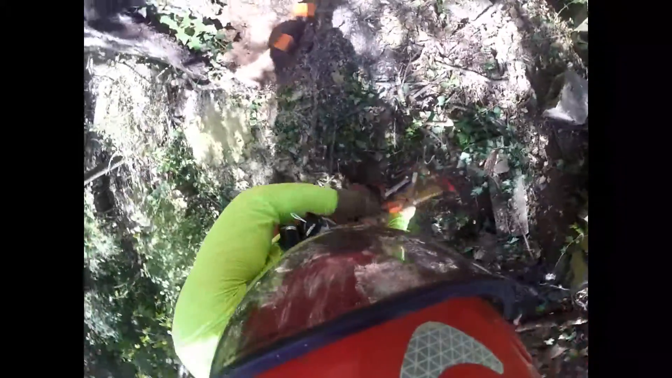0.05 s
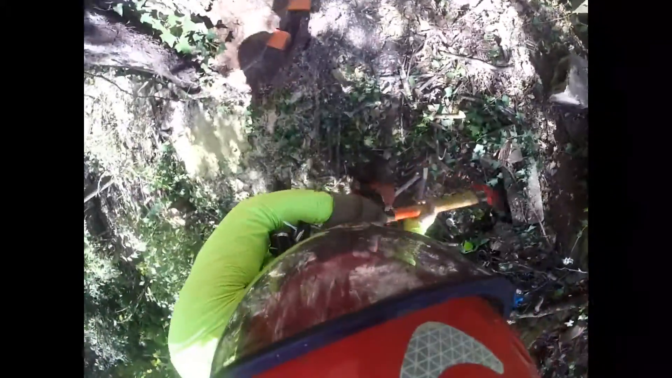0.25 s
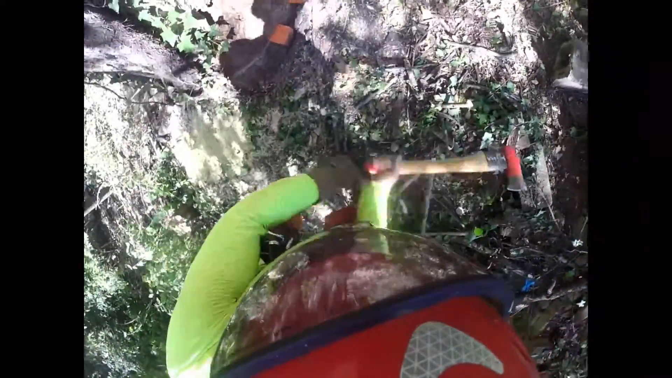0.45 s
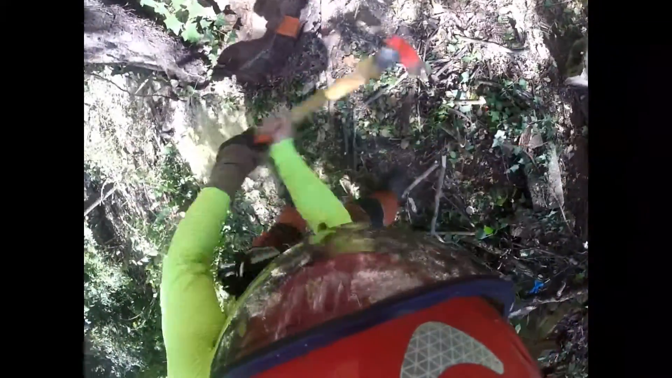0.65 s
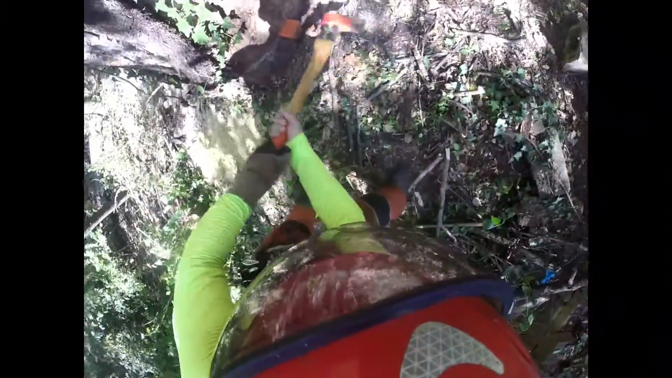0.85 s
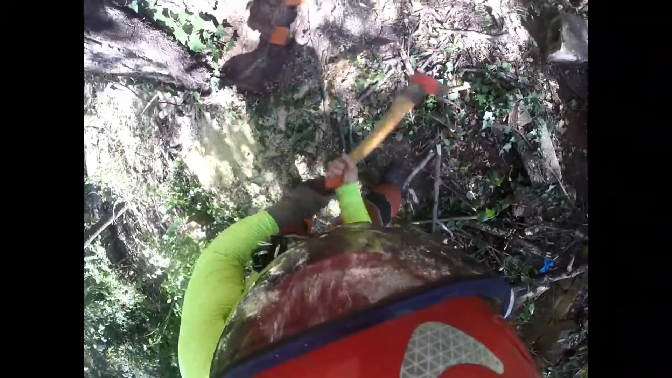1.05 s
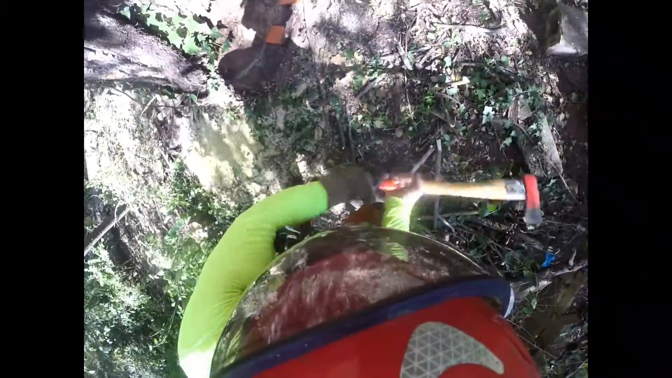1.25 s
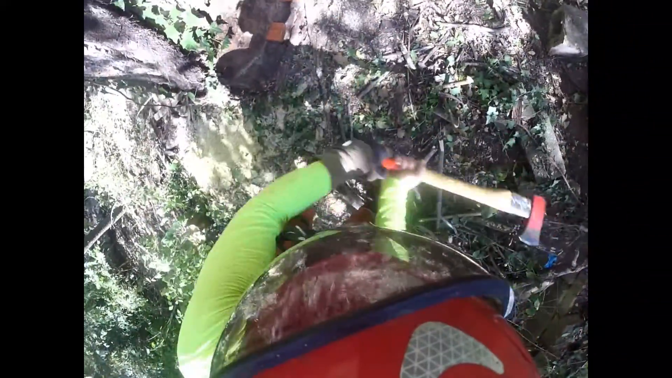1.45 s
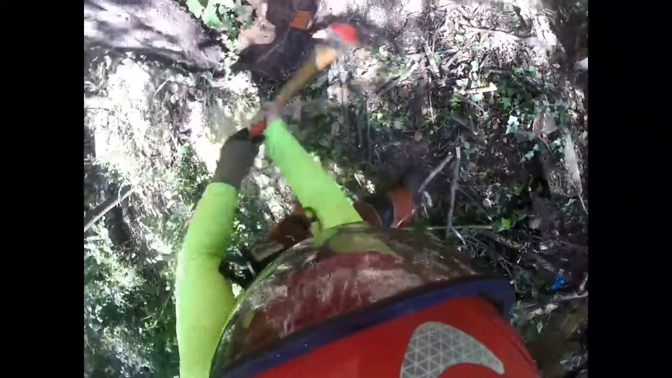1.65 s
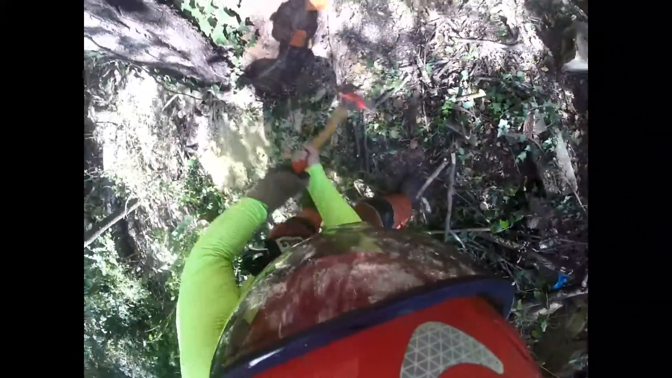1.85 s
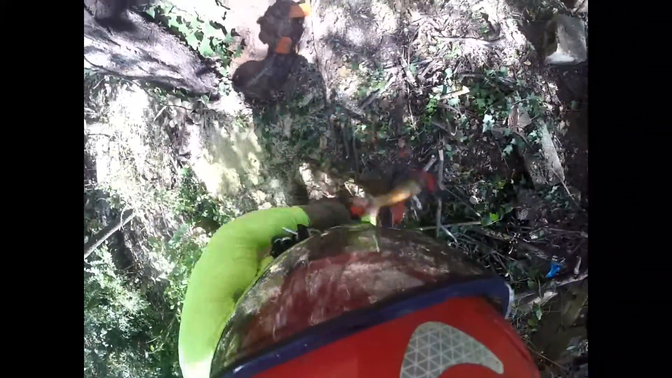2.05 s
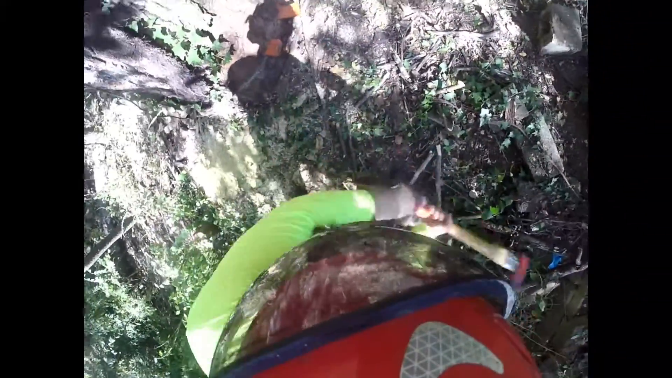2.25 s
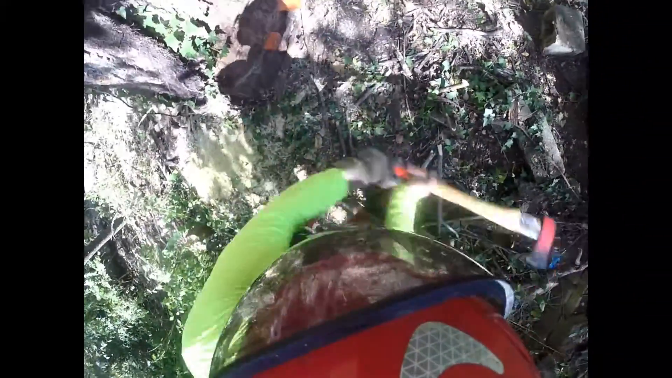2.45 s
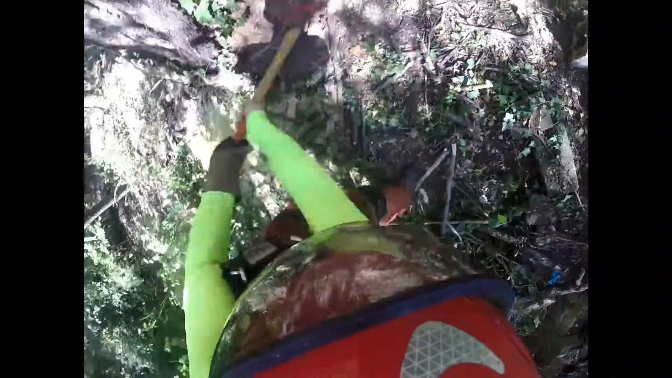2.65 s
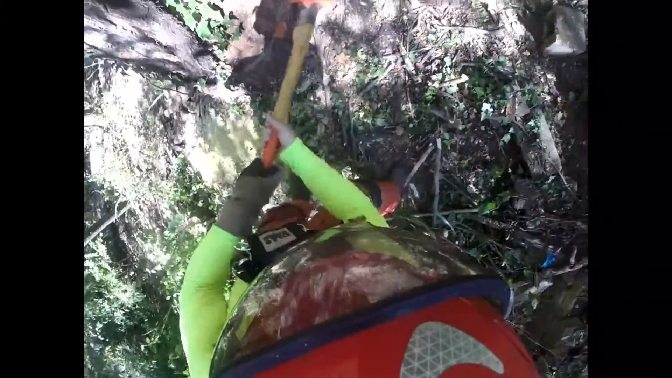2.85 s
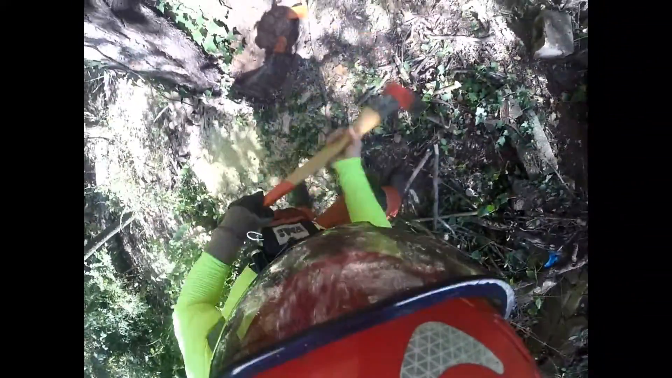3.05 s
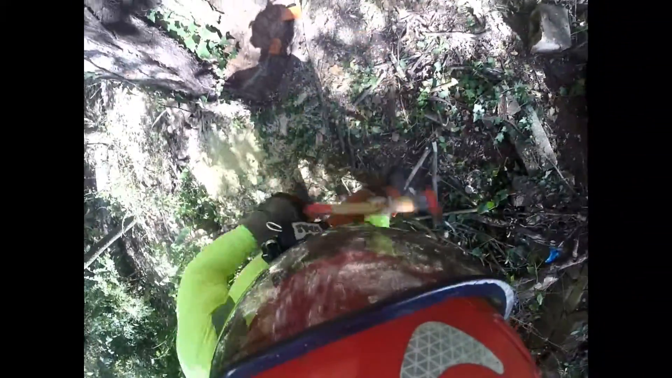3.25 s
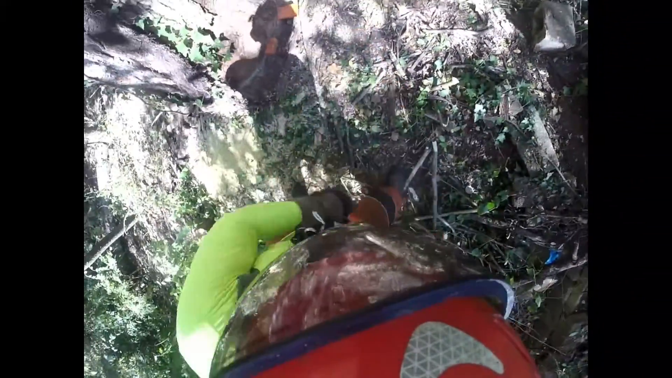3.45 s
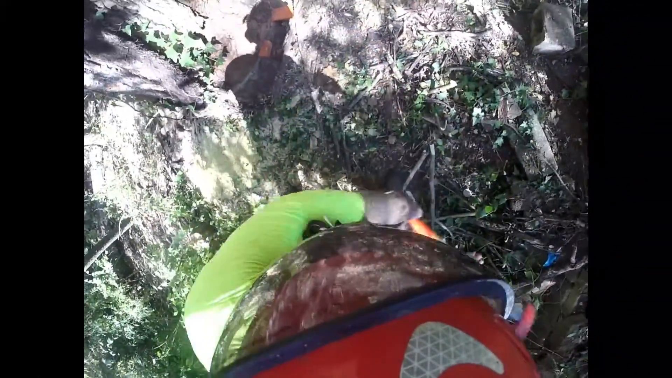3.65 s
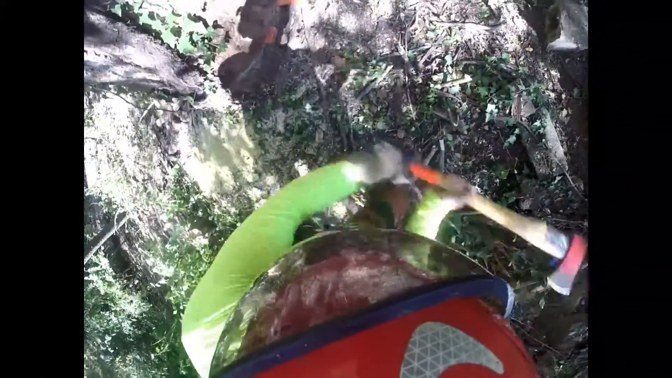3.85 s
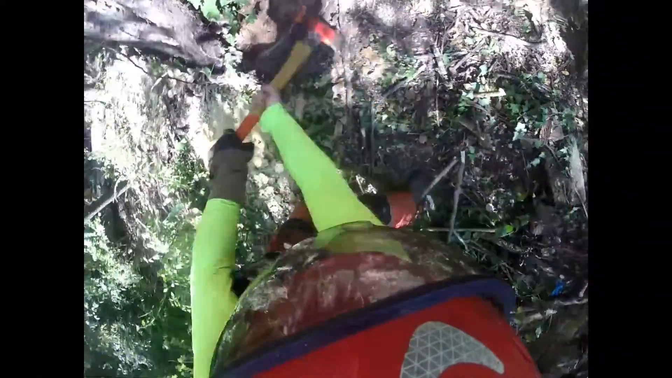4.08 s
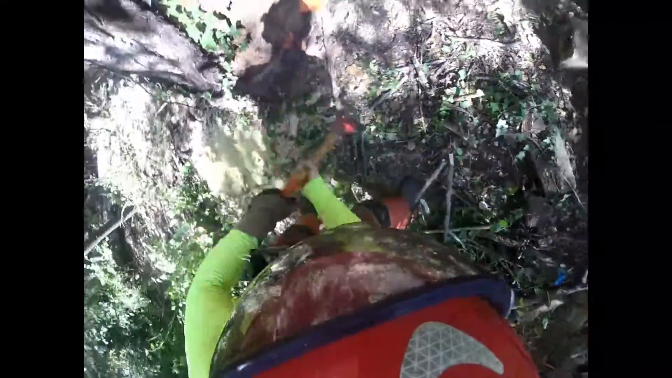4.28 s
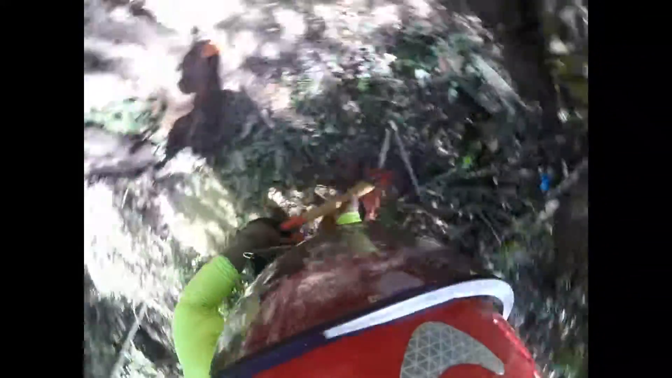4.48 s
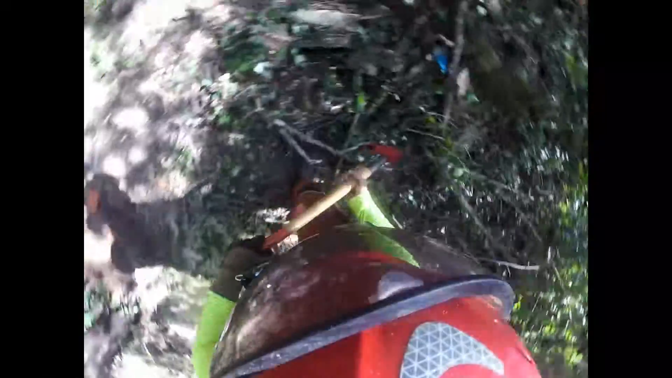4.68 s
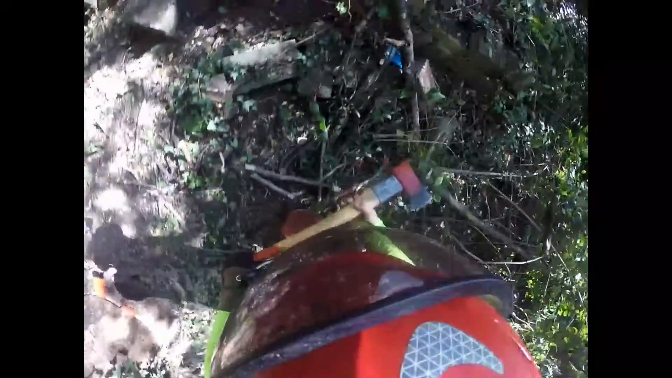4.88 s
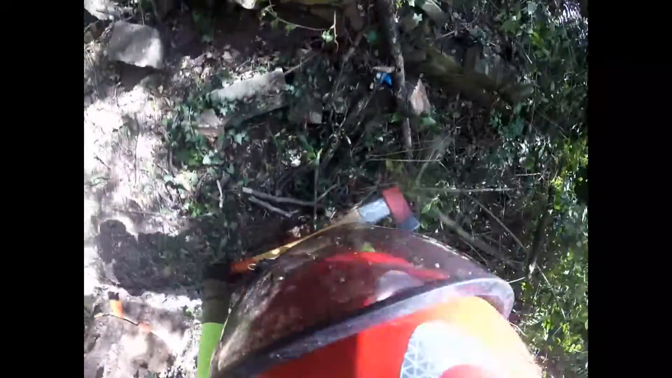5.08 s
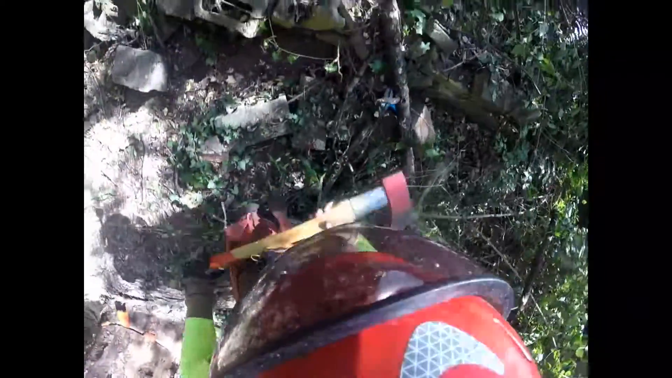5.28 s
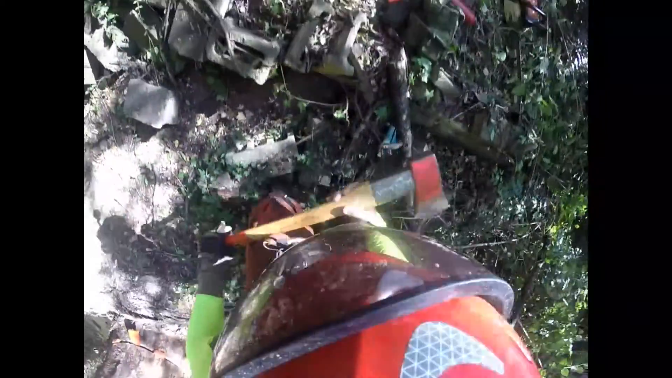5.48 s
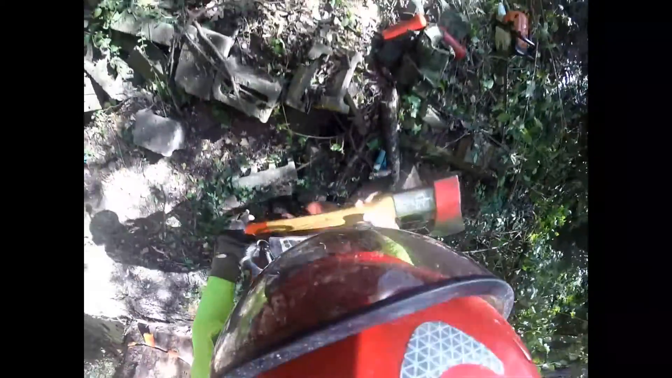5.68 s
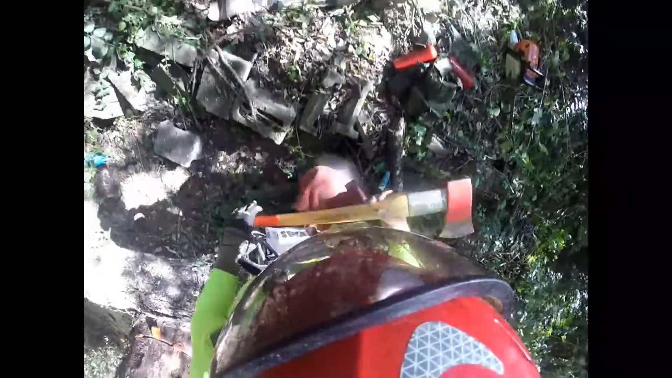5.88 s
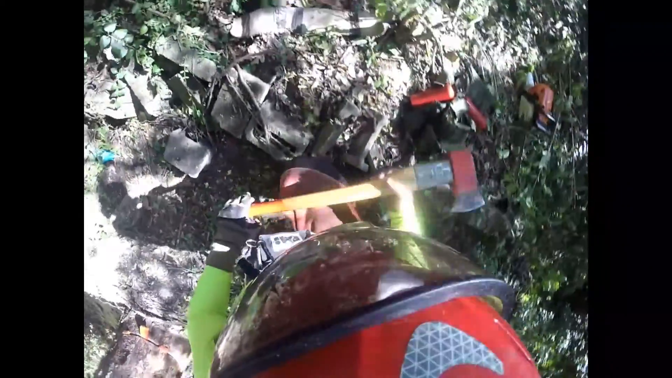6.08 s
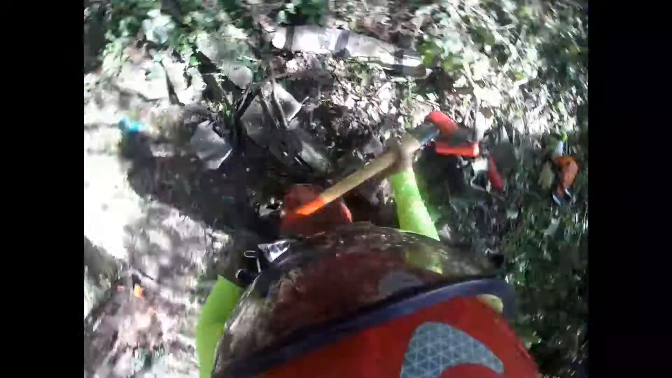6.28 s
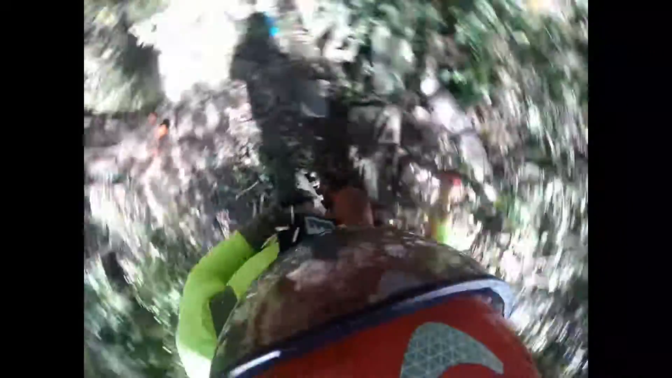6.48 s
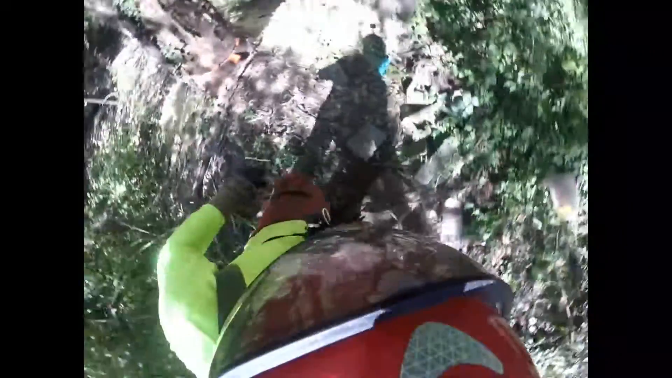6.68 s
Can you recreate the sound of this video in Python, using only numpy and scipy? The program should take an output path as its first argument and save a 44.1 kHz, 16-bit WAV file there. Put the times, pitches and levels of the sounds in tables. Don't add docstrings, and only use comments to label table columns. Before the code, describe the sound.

Outdoors in woodland, heard from a boxed camera on a helmet. Birds whistle while gear knocks and sleeves rub, then four hard hollow blows of an axe back hit a plastic wedge in a trunk, about a second apart. Each distorts, gives a quick slope echo and a rough woody tail. Twigs snap and the axe grazes a branch before the last blow; boots and harness gear thump and rustle afterwards.

```python
import sys
import numpy as np
from scipy import signal
from scipy.fft import rfft, irfft
from scipy.io import wavfile
from scipy.ndimage import uniform_filter1d

SR = 44100
rng = np.random.default_rng(int(sys.argv[2]) if len(sys.argv) > 2 else 0)


def boost(x):
    u = np.asarray(x, float) / 20
    return 10 ** u


def wrap_up_sound(samples):
    columns = np.atleast_2d(samples).T
    tamed = np.clip(columns, -1, 1)
    steps = np.round(tamed * 32767).astype(np.int16)
    wavfile.write(sys.argv[1], SR, steps)


N = 296352


def seconds(size):
    return np.arange(size) / SR


def noise(size):
    return rng.standard_normal(size)


def fade(t60_s, size):
    return boost(-60 * seconds(size) / t60_s)


def ring(hz, t60_s, size):
    return np.sin(2 * np.pi * hz * seconds(size)) * fade(t60_s, size)


def band(hz, width_hz, size):
    y = signal.lfilter(*signal.iirpeak(hz, hz / width_hz, fs=SR), noise(size))
    return y / np.std(y)


def colour(x, points):
    hz, level_db = np.transpose(points)
    bins_hz = np.maximum(np.fft.rfftfreq(len(x), 1 / SR), 1)
    gain_db = np.interp(np.log(bins_hz), np.log(hz), level_db, left=-80, right=-80)
    y = irfft(rfft(x) * boost(gain_db), len(x))
    return y / np.std(y)


def low(x, hz):
    return signal.sosfilt(signal.butter(2, hz, fs=SR, output="sos"), x)


def walk(rate_hz):
    k = int(SR / rate_hz)
    steps = np.repeat(noise(N // k + 1), k)
    y = uniform_filter1d(uniform_filter1d(steps, k), k)[:N]
    return y / np.std(y)


def add(out, start_s, x):
    i = int(start_s * SR)
    out[i:i + len(x)] += x[:len(out) - i]


# hz, level_db (density)
SNAP = [(1200, -5), (2600, 0), (4000, -2), (5600, -3), (8000, -16), (11000, -25), (15000, -36)]


def snap(size):
    return colour(noise(size), SNAP)


# start_s, drive_db, wedge_hz, wedge_t60_s, crack_db
BLOWS = [
    (0.789, 3, 744, 0.023, -17),
    (1.742, 8.5, 780, 0.021, -19),
    (2.7103, 1, 796, 0.032, -11),
    (4.1203, 8, 706, 0.015, -17.5),
]
# limiter_cut_db, echo_db, scatter_db, gain_duck_db
AFTER = [
    (0, -29, -39, -8.5),
    (-31.5, -25.5, -34.5, -8.5),
    (-10, -25.5, -35.5, -9.5),
    (-21.5, -24, -36.5, -10),
]
# handle_db, trunk_db, hollow_db, overtone_hz, overtone_db
LANDING = [
    (-13, -13, -5, 620, -3.5),
    (-17.5, -9.5, -12.5, 1480, -8.5),
    (-0.5, -3.5, -12.5, 566, 0),
    (-16, -9.5, -3.5, 870, -17),
]
# hz, t60_s
WOOD = [
    (131, 0.021),
    (427, 0.096),
    (530, 0.047),
]
# hz, level_db, t60_s
BODY = [(199, -10.5, .035), (305, -12, 0.032), (906, -23, 0.018), (1530, -22.5, 0.015), (2440, -20, 0.018),
        (3400, -30, 0.045), (3880, -19.5, 0.02)]


def strike(blow, after, landing, size):
    _, drive_db, wedge_hz, wedge_t60_s, crack_db = blow
    *wood_db, overtone_hz, overtone_db = landing
    t = seconds(size)
    lift_s = 0.156 * max(drive_db, 0) * 0.0011
    cycles = wedge_hz * (t + lift_s * (1 - np.exp(-t / 0.0016)))
    sound = 1.21 * np.sin(2 * np.pi * cycles) * fade(wedge_t60_s, size)
    sound += boost(overtone_db) * ring(overtone_hz, 1.3 * wedge_t60_s, size)
    for (hz, t60_s), level_db in zip(WOOD, wood_db):
        sound += boost(level_db) * ring(hz, t60_s, size)
    for hz, level_db, t60_s in BODY:
        level_chance, pitch_chance = noise(2)
        sound += boost(level_db + 2 * level_chance) * ring(hz * (1 + 0.015 * pitch_chance), t60_s, size)
    contact_s, push_s = 0.0026, 0.0013
    sound += boost(crack_db) * snap(size) * np.exp(-(t / contact_s) ** 2)
    push = np.sin(np.pi / 2 * np.minimum(t / push_s, 1)) ** 2
    no_bass = signal.butter(4, 105, "high", fs=SR, output="sos")
    sound = signal.sosfilt(no_bass, boost(drive_db) * push * sound)
    limiter_lag_s, limiter_bite_s = 0.004, 0.0012
    limiter_db = after[0] * np.clip((t - limiter_lag_s) / limiter_bite_s + 0.5, 0, 1)
    return signal.lfilter(*signal.butter(2, 70, "high", fs=SR), boost(limiter_db) * sound)


def slope_echo(size):
    echo = ring(806, 0.036, size) + 0.07 * snap(size) * np.exp(-(seconds(size) / 0.0026) ** 2)
    return echo + 0.5 * np.roll(echo, int(0.007 * SR))


# hz, level_db (density)
SCATTER = [(88, -21), (150, 5), (203, -13), (359, -5), (460, -16.5), (525, -3.5), (647, -4), (860, -3),
           (1140, -33), (3070, -17.5), (3640, -18), (5740, -19.5), (14000, -49.5)]
# hz, width_hz, level_db (re scatter), t60_s
BOX = [
    (2440, 600, -17.5, .8),
    (800, 120, -12.5, 1),
]
# hz, level_db (re scatter)
TAIL = [
    [(2040, -13), (3020, -9)],
    [(2440, -7), (1750, -14.5)],
    [(2516, -19), (3100, -12.5)],
    [(2000, -21), (2660, -14.5)],
]


def wood_scatter(tones, size):
    scatter = colour(noise(size), SCATTER)
    dull = low(scatter, 7000)
    t60_s = 0.41
    tail = dull * fade(1.28 * t60_s, size) + (scatter - dull) * fade(0.76 * t60_s, size)
    for hz, width_hz, level_db, box_t60_s in BOX:
        tail += boost(level_db) * band(hz, width_hz, size) * fade(box_t60_s, size)
    for hz, level_db in tones:
        tail += boost(level_db) * band(hz, 170, size) * fade(0.6, size)
    return tail * np.minimum(seconds(size) / 0.0028, 1)


def blows():
    out, size, echo_s = np.zeros(N), SR * 3 // 4, 0.0785
    for blow, after, landing, tones in zip(BLOWS, AFTER, LANDING, TAIL):
        start_s = blow[0]
        _, echo_db, scatter_db, _ = after
        add(out, start_s, strike(blow, after, landing, size))
        add(out, start_s + echo_s, boost(echo_db) * slope_echo(size))
        add(out, start_s, boost(scatter_db) * wood_scatter(tones, size))
    return out


# start_s, peak_db, hollow_hz, snap_db
KNOCKS = [(0.091, -31, 770, -33.5), (0.116, -42, 608, -36), (0.167, -39, 1490, -35.5),
          (0.469, -23, 680, -38), (0.546, -18, 597, -42), (1.482, -26.5, 670, -37), (2.248, -44, 466, -48),
          (2.65, -38, 654, -39.5), (3.784, -34, 393, -39.5), (4.178, -21.5, 457, -32),
          (5.273, -43, 670, -38), (5.351, -50, 781, -46), (5.814, -16, 570, -33.5), (6.05, -27, 785, -50),
          (6.068, -26, 1005, -42), (6.264, -28, 740, -41), (6.4955, -25, 690, -34), (6.52, -19.5, 710, -22)]
# start_s, peak_db, hollow_hz, snap_db, snap_hz
TWIGS = [(0.191, -42, 715, -35, 4190), (0.451, -25, 550, -40, 4770), (1.694, -39, 842, -34, 5300),
         (3.972, -14, 800, -20, 5200), (3.98, -18.5, 523, -26, 3880), (4.06, -28, 784, -24.5, 5860),
         (5.274, -43, 670, -37.5, 5540), (5.394, -53, 407, -41, 3800), (5.456, -22.5, 415, -37, 5210),
         (5.504, -34, 690, -31, 5570)]


def knocks():
    out, size = np.zeros(N), SR // 5
    gear = [(*row, 2595, 0.042) for row in KNOCKS]  # snap_hz, snap_t60_s
    twigs = [(*row, 0.028) for row in TWIGS]
    for start_s, peak_db, hollow_hz, snap_db, snap_hz, snap_t60_s in gear + twigs:
        hollow = ring(hollow_hz, 9 / hollow_hz + 0.025, size)
        hollow += 0.5 * ring(0.97 * hollow_hz, 9 / hollow_hz + 0.01, size)
        dry_snap = 0.54 * snap(size) + 0.55 * band(snap_hz, 0.033 * snap_hz, size)
        dry_snap *= fade(snap_t60_s, size)
        add(out, start_s, 0.52 * boost(peak_db) * hollow + 0.5 * boost(snap_db) * dry_snap)
    return out


# start_s, level_db
GRAZE = [
    (3.973, -20.5),
    (3.981, -34),
]
# hz, level_db, t60_s
HEAD = [(3780, -1, 0.014), (6050, -2, 0.013), (2740, -7, .02)]


def graze():
    out, size = np.zeros(N), SR // 5
    for start_s, level_db in GRAZE:
        for hz, mode_db, t60_s in HEAD:
            add(out, start_s, boost(level_db + mode_db) * ring(hz, t60_s, size))
    return out


# start_s, peak_db, hz, cycles
THUDS = [(0.093, -32, 99, 2.5), (0.209, -34, 59.3, 2.4), (.466, -21.5, 132, 3), (0.548, -19.5, 175, 1.7),
         (5.45, -32, 35.2, 3.1), (5.457, -21.5, 252, 2.7), (5.57, -13.5, 180, 0.79), (6.044, -25, 124, 1.3)]


def thuds():
    out, size = np.zeros(N), SR // 5
    nods = [(blow[0] + 0.081, -36, 60, 2.6) for blow in BLOWS]
    for start_s, peak_db, hz, cycles in THUDS + nods:
        onset = np.minimum(seconds(size) * hz * 2, 1)
        add(out, start_s, boost(peak_db) * ring(hz, 3.3 * cycles / hz, size) * onset)
    return out


# start_s, peak_db, hz, t60_s
CLINKS = [(0.966, -62, 13400, 0.05), (1.696, -41, 5400, 0.061), (2.148, -50, 13510, .14),
          (2.651, -54, 10350, 0.068), (2.829, -55, 13300, 0.075), (3.101, -73, 13500, 0.091),
          (4.061, -48, 10450, 0.048), (4.23, -77, 13400, .1), (2.421, -71, 13300, .08),
          (5.395, -54, 10800, 0.023), (4.6, -56.5, 13500, 0.081), (4.789, -60, 14000, 0.026)]


def buckle():
    out, size = np.zeros(N), SR // 4
    for start_s, peak_db, hz, t60_s in CLINKS:
        tick = np.diff(noise(size + 1)) * fade(0.0097, size)
        pair = ring(hz, t60_s, size) + 0.23 * ring(0.978 * hz, 0.8 * t60_s, size)
        add(out, start_s, boost(peak_db) * (pair + 0.39 * tick))
    return out


def grains(rate_hz, scatter_db):
    hits = noise(N) * (rng.random(N) < rate_hz / SR)
    return hits * boost(scatter_db * np.minimum(rng.exponential(size=N), 4))


EARLY_S = [.014, .007, .016, .017]
# time_s, level_db
MOTION = [(0, -59), (.146, -50.5), (.334, -51.5), (.69, -62.5), (1.55, -51.5), (2.6, -57.5), (3.4, -62),
          (3.7, -51), (4.05, -55), (4.84, -51), (5.09, -51), (5.44, -48.5), (5.67, -45.5), (5.83, -55.5),
          (6.19, -60), (6.72, -53)]


def motion_levels():
    t = seconds(N)
    bed_db, rush = np.interp(t, *np.transpose(MOTION)), np.zeros(N)
    starts_s = [blow[0] for blow in BLOWS]
    still_s, resume_db, resume_db_s = 0.58, -15, 79
    swing_s, swing_db = 0.06, -50
    for start_s, until_s in zip(starts_s, starts_s[1:] + [N / SR]):
        rested_s = t - start_s - still_s
        back_db = np.where(rested_s > 0, np.minimum(resume_db + resume_db_s * rested_s, 0), -80)
        bed_db += back_db * (t > start_s) * (t <= until_s)
        rush += boost(swing_db) * np.exp(np.minimum(t - start_s, 0) / swing_s) * (t < start_s)
    return np.array([boost(bed_db) + rush, boost(bed_db - 12.5)])


# hz, level_db (density)
RUB = [(60, 1.5), (150, 3.5), (300, 0.5), (600, 3), (900, -0.5), (1200, -17.5), (2000, -50)]
# hz, level_db (density)
LEAVES = [(650, -35.5), (1100, -3), (1400, -7), (2410, 1.5), (3220, -11), (3560, -5), (6250, -4.5),
          (6990, -9), (9630, -19), (15500, -31)]
# peak_s, fall_s, dull_db, crisp_db, rasp_hz
SCRAPES = [(0.099, 0.02, -42, -53, 2700), (.462, 0.079, -37.5, -57, 2190), (0.511, 0.092, -45, -51.5, 4800),
           (1.65, 0.022, -53.5, -61.5, 3070), (3.103, 0.031, -70, -67, 2500), (3.78, 0.011, -47, -58, 5505),
           (3.991, 0.039, -52.5, -53, 5535), (4.86, 0.015, -47.5, -66, 2800),
           (5.059, 0.027, -72, -59, 2850), (5.296, 0.009, -40, -59, 5500),
           (5.458, 0.017, -32.5, -51.5, 5300), (5.823, 0.039, -36, -53.5, 5730),
           (6.0, 0.025, -45, -57, 4480), (6.065, 0.16, -50.5, -55.5, 2620), (6.29, 0.21, -51, -61.5, 5460),
           (6.512, 0.067, -38, -41.5, 6050)]


def rustle():
    t, rasp = seconds(N), np.zeros(N)
    dull = colour(grains(2500, 3.0), RUB) * boost(4.1 * walk(33))
    crisp = colour(grains(4000, 2.5), LEAVES) * boost(0.96 * walk(40))
    crisp += boost(-9) * colour(grains(45, 4.0), SNAP)
    crisp += boost(-5.5 + 3.4 * walk(17)) * band(2700, 440, N)
    level = motion_levels()
    for peak_s, fall_s, dull_db, crisp_db, rasp_hz in SCRAPES:
        near = slice(max(int((peak_s - 0.09) * SR), 0), int((peak_s + 0.4) * SR))
        u = (t[near] - peak_s) / fall_s
        stroke = np.exp(-np.where(u < 0, (u / 0.25) ** 2, np.abs(u) ** 1.5))
        level[:, near] += np.outer(boost([dull_db, crisp_db]), stroke)
        rasp[near] += boost(crisp_db - 3) * stroke * band(rasp_hz, 0.18 * rasp_hz, len(u))
    for (start_s, *_), early_s in zip(BLOWS, EARLY_S):
        level[:, int((start_s - early_s) * SR):int(start_s * SR)] *= boost(-28)
    return level[0] * dull + level[1] * crisp + rasp


# start_s, length_s, start_hz, end_hz, level_db
BIRDS = [(0, .025, 4050, 4000, -56), (.05, .055, 3900, 4100, -52), (.06, .04, 4850, 4900, -60),
         (.15, .03, 3950, 4450, -56), (.17, .06, 3900, 4270, -51), (.17, .055, 3400, 3760, -53),
         (.175, .055, 4500, 4760, -60), (.3, .11, 3700, 3980, -57), (.305, .1, 4150, 4520, -55),
         (.3, .09, 3100, 3300, -60), (.32, .08, 4950, 5100, -60), (.45, .075, 4720, 4800, -54),
         (.45, .09, 4200, 4450, -59), (.49, .1, 3800, 3950, -57), (.55, .07, 4820, 4870, -58),
         (.61, .075, 3920, 3900, -57), (.69, .055, 4700, 4900, -61), (1.655, .04, 8150, 8050, -57),
         (2.01, .04, 7300, 6200, -66), (2.235, .15, 3860, 3840, -66), (2.26, .11, 3620, 3600, -70),
         (4.78, .03, 6300, 6300, -64), (6.385, .09, 3960, 3940, -57)]


def birds():
    out, waver = np.zeros(N), walk(65)
    for start_s, length_s, start_hz, end_hz, level_db in BIRDS:
        size, i = int(length_s * SR), int(start_s * SR)
        bend = np.tanh(np.linspace(0, 2.5, size))
        hz = (start_hz + (end_hz - start_hz) * bend) * (1 + 0.008 * waver[i:i + size])
        whistle = np.hanning(size) ** 0.19 * np.sin(2 * np.pi * np.cumsum(hz) / SR)
        add(out, start_s, boost(level_db - 6.5) * whistle)
    trees = noise(SR // 8) * fade(0.12, SR // 8)
    return out * boost(2.5 * walk(120)) + boost(-28) * signal.fftconvolve(out, trees)[:N]


# hz, level_db (density)
AIR = [(13, -36.5), (22, 2.5), (96, -4.5), (125, -2.5), (219, -11), (257, -7.5), (318, -9), (426, -8),
       (975, -15), (1140, -22), (3910, -29.5), (5110, -34), (7420, -37.5), (8480, -44), (13200, -50)]


def forest():
    air = colour(noise(N), AIR)
    bass = low(air, 200)
    air = bass * boost(1.5 * walk(5)) + (air - bass) * boost(1.2 * walk(8))
    insect_hz, width_hz = 7400, 680
    chirr = [(insect_hz - width_hz, -14), (insect_hz, 0), (insect_hz + width_hz, -14), (9000, -60)]
    return boost(-46) * air + boost(-70 + 1.3 * walk(37)) * colour(noise(N), chirr)


def camera_gain():
    t, gain_db = seconds(N), np.zeros(N)
    hold_s, rise_db_s = 0.37, 13.5
    for (start_s, *_), (*_, duck_db), early_s in zip(BLOWS, AFTER, EARLY_S):
        back_db = duck_db + rise_db_s * np.maximum(t - start_s - hold_s, 0)
        gain_db = np.where(t > start_s - early_s, np.minimum(back_db, 0), gain_db)
    return uniform_filter1d(boost(gain_db), int(0.003 * SR))


def scene():
    events = blows() + knocks() + graze() + thuds() + buckle() + rustle() + birds()
    return (events + camera_gain() * forest())[None]


def band_limit(x):
    return signal.sosfilt(signal.butter(12, 16520, fs=SR, output="sos"), x)


def record(dry):
    top_cut = signal.ellip(6, 0.3, 50, 15000, fs=SR, output="sos")
    x = signal.sosfilt(top_cut, np.clip(dry, -1, 1))
    return band_limit(0.98 * np.clip(x, -1, 1))


dry = scene()
out = record(dry)
wrap_up_sound(out)
```